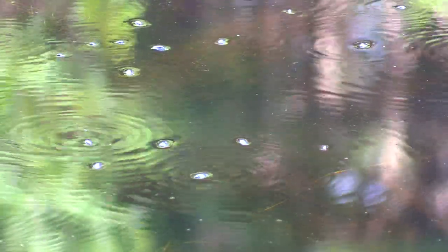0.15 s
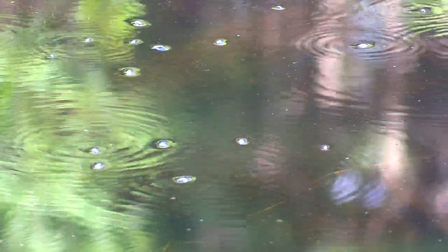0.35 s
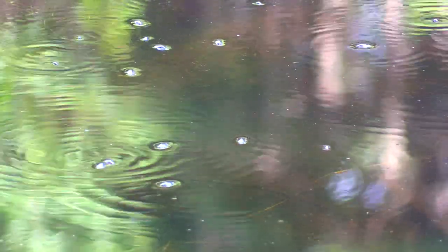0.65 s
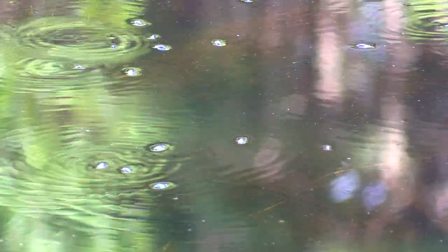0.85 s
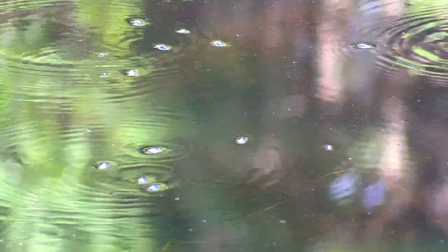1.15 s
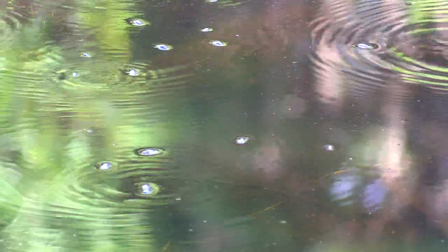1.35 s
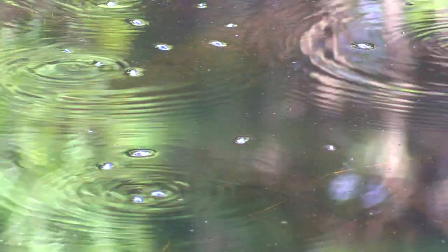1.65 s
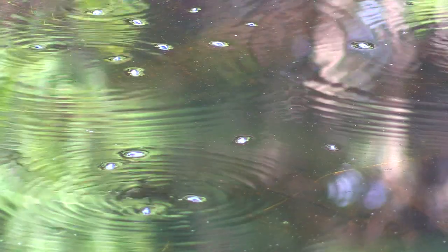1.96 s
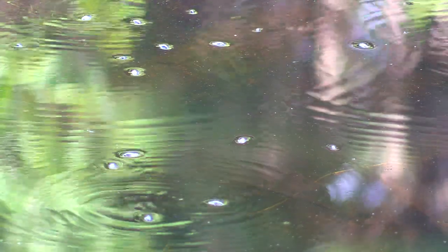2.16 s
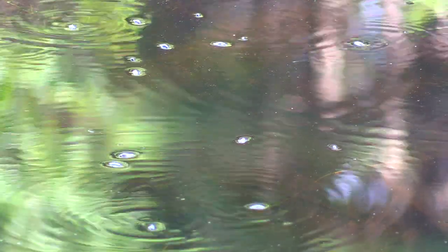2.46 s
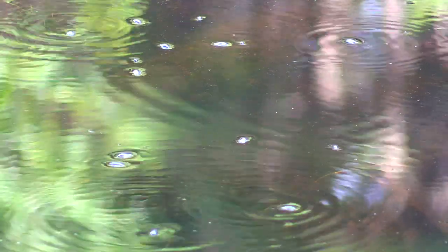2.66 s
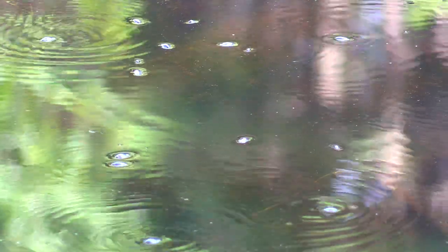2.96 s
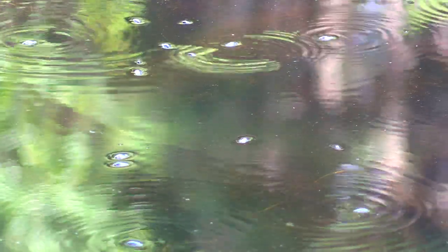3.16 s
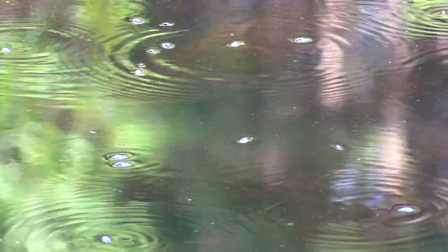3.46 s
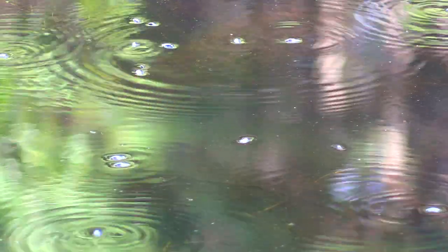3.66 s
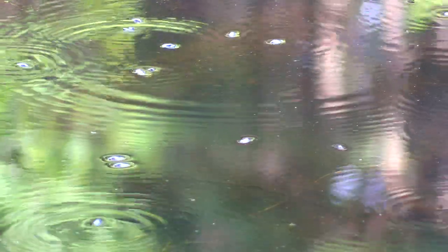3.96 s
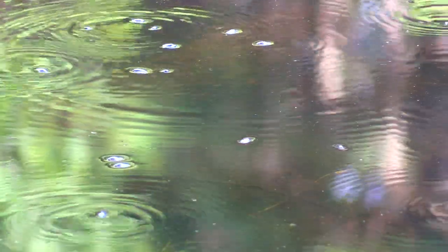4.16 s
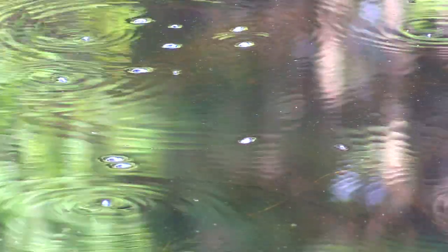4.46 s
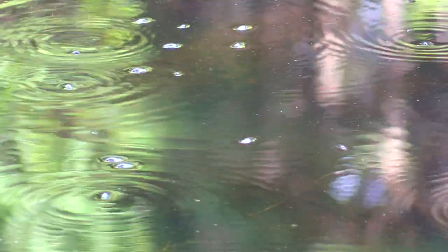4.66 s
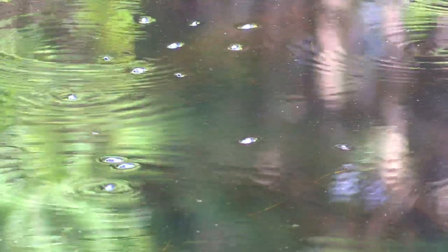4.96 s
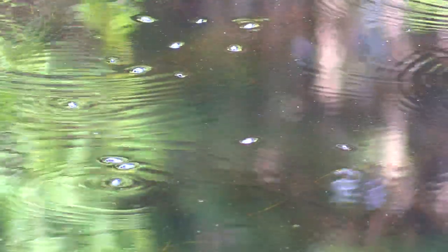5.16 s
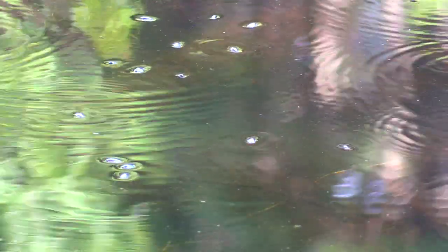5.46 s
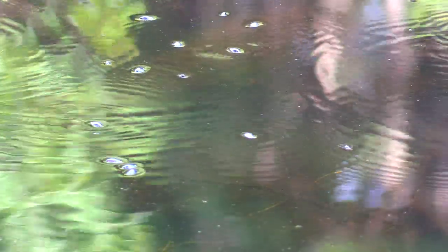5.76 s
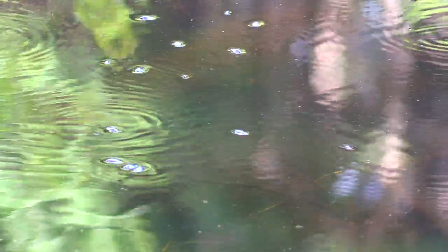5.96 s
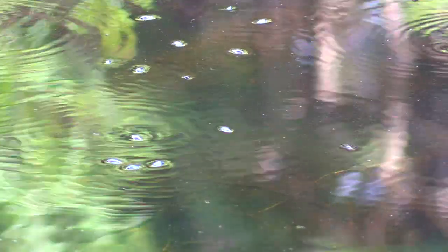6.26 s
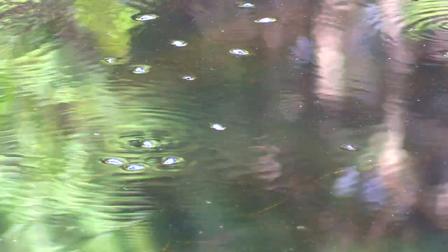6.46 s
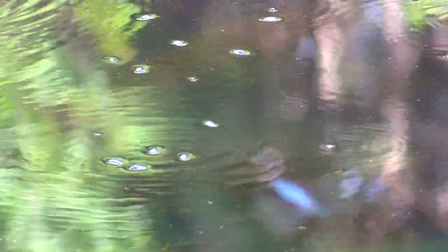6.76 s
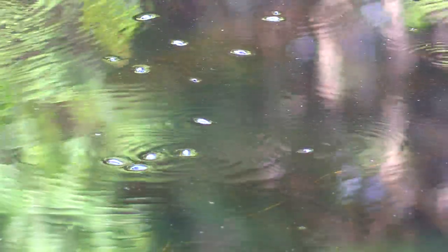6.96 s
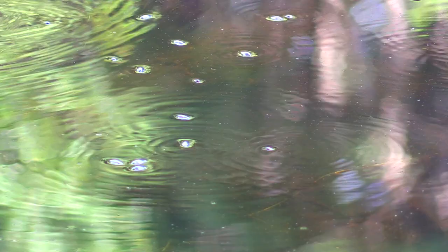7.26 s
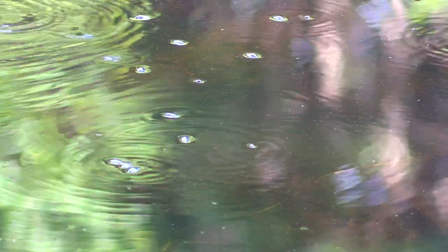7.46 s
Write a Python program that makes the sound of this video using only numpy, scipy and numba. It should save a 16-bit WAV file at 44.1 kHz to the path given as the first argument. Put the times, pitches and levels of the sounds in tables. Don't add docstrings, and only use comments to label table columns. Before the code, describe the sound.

A cicada sings close by at a summer pond, slightly left. Its dense, metallic high buzz swells from faint to full in just over a second while a far bird whistles softly. It falters with tiny dry snaps, breaks off, and a slightly slower, fluttering buzz takes over, steady for several seconds, then rougher and sliding down. Low airy noise, faint motor hum and distant insects lie beneath. Clean outdoor stereo pickup.

```python
import sys
import numpy as np
from scipy import signal
from scipy.io import wavfile
from scipy.ndimage import uniform_filter1d
from numba import njit

SR = 44100
rng = np.random.default_rng(int(sys.argv[2]) if len(sys.argv) > 2 else 0)


def gain_from_db(level_db):
    decades = np.asarray(level_db, float) / 20
    return 10 ** decades


def wav_out(sig):
    wavfile.write(sys.argv[1], SR, np.round(np.clip(np.atleast_2d(sig).T, -1, 1) * 32767).astype(np.int16))


N = 336042
STEP = 32
FRAMES = N // STEP + 2
LOWEST, OVERTONES = 23, 42
SECOND_HZ = 203.28
BREAK_S = 2.335

# (other overtones [dB], slow level sway [dB], restless sway [dB], left-right [dB])
POSTURES = [
    (-3, 1, .5, 0),
    (-5.5, 0, 2.5, 2.5),
    (-4, 0.5, 2.5, 2.5),
    (3.5, 4, 4, 2.2),
    (1.5, 1.5, 2, 1),
    (-2.5, 3, .5, 4.5),
    (5, 1, 1.5, 3.5),
    (4.5, 2.5, 1, 3),
    (-1, 5, 2.5, 2.5),
    (0, -0.5, 1, 3),
]


def cicada():
    s = np.arange(FRAMES) * STEP / SR
    level_db, ragged_db, rate_hz, flutter_hz, flutter_depth = effort(s)
    shares = posture_shares(s)
    sway_db, restless_db, pan_db = np.array(POSTURES)[:, 1:].T @ shares
    tremor_hz = 0.064 + 0.046 * gain_from_db(ragged_db / 2)

    heights = comb(shares)
    count = len(heights)
    neighbours = uniform_filter1d(heights ** 2, size=3, axis=0)
    even = np.sqrt(.5 * heights ** 2 + .5 * neighbours)
    hz = (LOWEST + np.arange(count)[:, None]) * rate_hz
    late = shares[-1]
    heights = heights + late * leaves(hz)
    above = even + late * leaves(hz + flutter_hz)
    below = even + late * leaves(hz - flutter_hz)
    broad = np.sqrt(uniform_filter1d(heights ** 2, size=9, axis=0))

    belly = 0.71 + 0.89 * np.exp(-((hz - 7700) / 900) ** 2)
    wavering_hz = flutter_hz + 2.74 * wander(7.2, count=1)[0].real
    beat = np.exp(2j * np.pi * np.cumsum(wavering_hz) * STEP / SR)
    high = np.clip((hz - 9500) / 3000, 0, 1)
    force = 1 + 0.041 * wander(35, count=1).real

    paths = []
    for path_db in (0 * high, -4.5 + 6.8 * high):
        creep = np.exp(.9j * wander(1.14, count).real)
        start = spin(count)
        slow_db = sway_db * wander(1.3, count).real
        quick_db = 0.96 * restless_db * wander(5.5, count).real
        line = start * creep * gain_from_db(slow_db + quick_db) + gain_from_db(-16.0) * wander(15.4, count)
        upper = above * wander(2.4, count) * beat
        lower = below * wander(1.2, count) / beat
        flutter = flutter_depth * belly * (upper + lower)
        rasp = gain_from_db(ragged_db) * np.sqrt(belly) * wander(85, count) * (above + below + 1.7 * broad) / 2
        voice = force * (heights * line + flutter + rasp)
        power = uniform_filter1d(np.sum(abs(voice) ** 2, axis=0) / 2, size=150)
        paths.append(gain_from_db(path_db + level_db) * voice / np.sqrt(power))

    mid, side = paths
    shared = np.sum(side * mid.conj(), axis=0).real / np.sum(abs(mid) ** 2, axis=0)
    side = side - mid * shared
    lean = np.tanh(0.075 * pan_db) * (1 - high)
    ports = np.array([mid * (1 + lean) + side, mid * (1 - lean) - side])
    rate_hz = rate_hz + tremor_hz * wander(11.1, count=1)[0].real
    phase = 2 * np.pi * np.cumsum(np.interp(np.arange(N) / SR, s, rate_hz)) / SR
    return overtones(np.ascontiguousarray(ports.transpose(0, 2, 1)), phase, LOWEST, STEP)


# (time [s], level [dB], strain as raggedness [dB])
FIRST_SONG = [
    (0, -38, -24),
    (.45, -35, -33),
    (.9, -28.5, -32),
    (1.26, -23, -30),
    (1.7, -21.5, -29),
    (2.15, -23, -24),
    (2.19, -22.5, -8),
    (2.31, -26, -2),
]
SECOND_SONG = [
    (2.36, -25, -2),
    (2.5, -25, -9),
    (3.0, -24.5, -15),
    (4.4, -24, -23),
    (5.45, -24, -15),
    (5.72, -24.5, -9.5),
    (6.0, -22, -14.5),
    (6.5, -23.5, -14.5),
    (7.62, -27, -0.5),
]
# (time [s], level [dB], half width [s])
DIPS = [
    (1.835, -2.2, .018),
    (2.328, -6.5, .02),
]


def effort(s):
    level_db, strain_db = curves(FIRST_SONG + SECOND_SONG, s)
    for dip_s, dip_db, half_s in DIPS:
        level_db = level_db + dip_db * np.exp(-((s - dip_s) / half_s) ** 4)
    second = s > BREAK_S
    first_hz = 208.87 - 18 * np.maximum(s - 2.21, 0)
    second_hz = tiring(s, SECOND_HZ, settle_hz=1.1, down_hz=6.55, down_s=.73)
    flutter_hz = tiring(s, 54.2, settle_hz=16, down_hz=31, down_s=1.15)
    flutter_depth = second * gain_from_db(-4.5 + 0.62 * strain_db)
    return level_db, strain_db, np.where(second, second_hz, first_hz), flutter_hz, flutter_depth


def tiring(s, steady_hz, settle_hz, down_hz, down_s):
    unsettled_hz = settle_hz * np.exp(-np.maximum(s - BREAK_S, 0) / .28)
    lost_hz = down_hz * np.exp((s - N / SR) / down_s)
    return steady_hz - unsettled_hz - lost_hz


# (start [s], duration [s])
SHIFTS = [(1.1, .15), (1.48, .1), (1.8, .07), (2.3, .06), (2.75, .25), (4.35, .3), (5.0, .25), (5.68, .12),
          (6.7, .35)]


def posture_shares(s):
    place = sum(np.clip((s - start) / length, 0, 1) for start, length in SHIFTS)
    return np.clip(1 - abs(place - np.arange(len(POSTURES))[:, None]), 0, 1)


# (multiple of the stroke rate [1], level [dB])
RISING = [(23, -16), (27, -15), (29, -5), (32, -13), (33, -14), (37, -7), (38, -6), (39, -3), (40, -8),
          (41, -8), (42, -10), (44, 0), (46, -9), (52, -17)]
FULL = [(27, -15), (29, -8), (35, -15), (39, 0), (40, -12), (43, -11), (44, -11), (45, -11), (46, -16)]
LEANING = [(26, -16), (28, -13), (29, -14), (32, -10), (34, -14), (37, -14), (38, -10), (39, -3), (40, 0),
           (43, -11), (45, -7), (47, -15)]
TURNED = [(26, -13), (28, -4), (29, -8), (31, -20), (32, -14), (34, -10), (37, -8), (38, -2), (39, 0),
          (40, -3), (41, -6), (43, -9), (44, -6), (46, -9)]
STARTING = [(24, -18), (28, -9), (29, -6), (30, -6), (31, -5), (35, -7), (37, 0), (40, -4), (41, -2),
            (43, -7), (44, -5), (46, -6)]
SETTLED = [(24, -13), (28, -9), (30, -3), (32, -20), (34, -9), (37, -8), (40, -6), (41, 0), (43, -11),
           (45, -12), (47, -4), (49, -15), (51, -18), (53, -17)]
OPEN = [(24, -12), (28, -3), (30, -2), (35, -4), (37, -1), (39, -2), (40, 0), (41, -3), (43, -6), (45, -3),
        (47, -4), (51, -13), (53, -14)]
WIDE = [(25, -14), (28, -7), (29, -5), (30, -7), (31, -7), (35, -4), (37, -1), (39, 0), (40, -4), (43, -6),
        (44, -6), (45, -4), (46, -3), (51, -14)]
TIRING = [(25, -21), (29, -6), (33, -6), (35, -6), (37, -12), (39, 0), (40, -13), (43, -6), (44, -10),
          (45, -13), (46, -9), (50, -17), (52, -18)]
# (frequency [Hz], level [dB])
BODY = [(4700, -27.5), (5500, -23), (7400, -13.5), (9400, -15), (10600, -26.5), (13200, -37)]


def comb(shares, scatter_db=4.5):
    favourites = [RISING, FULL, LEANING, TURNED, STARTING, SETTLED, OPEN, WIDE, TIRING]
    body_db = at_hz(BODY, (LOWEST + np.arange(OVERTONES)) * SECOND_HZ)
    scatter = np.minimum(rng.standard_normal((len(favourites), OVERTONES)), 1.5)
    db = body_db + np.array(POSTURES)[:-1, [0]] + scatter_db * scatter
    for row, standing_out in zip(db, favourites):
        multiple, level_db = np.transpose(standing_out)
        row[multiple - LOWEST] = level_db
    heights = gain_from_db(db)
    power = np.sum(heights ** 2, axis=1, keepdims=True) / 2
    return (heights / np.sqrt(power)).T @ shares[:-1]


# (frequency [Hz], width [Hz], level [dB])
LEAVES = [(5430, 34, -16), (5720, 50, -3), (5840, 31, -4), (6180, 48, -12), (6640, 86, -5), (7070, 97, -7),
          (7410, 55, 0), (7640, 20, -8), (7850, 66, 0), (8110, 63, -5), (8620, 81, -3), (8830, 42, -3),
          (9080, 140, -6), (9620, 150, -13)]


def leaves(hz, floor_db=-25.0):
    power = gain_from_db(2 * floor_db) * np.exp(-((hz - 7500) / 2500) ** 2)
    for centre_hz, width_hz, db in LEAVES:
        power = power + gain_from_db(2 * db) / (1 + (2 * (hz - centre_hz) / width_hz) ** 2)
    return np.sqrt(power / np.mean(np.sum(power, axis=0) / 2))


@njit
def overtones(gains, phase, first, step):
    out = np.zeros((gains.shape[0], len(phase)))
    for i in range(len(phase)):
        j, part = i // step, (i % step) / step
        turn, z = np.exp(1j * phase[i]), np.exp(1j * first * phase[i])
        for k in range(gains.shape[2]):
            for c in range(gains.shape[0]):
                gain = gains[c, j, k] * (1 - part) + gains[c, j + 1, k] * part
                out[c, i] += (gain * z).real
            z *= turn
    return out


def spin(count, turns=.75):
    return np.exp(2j * np.pi * turns * rng.random((count, 1)))


def wander(rate_hz, count):
    r = np.exp(-2 * np.pi * rate_hz * STEP / SR)
    shape = (count, FRAMES + 1000)
    white = rng.standard_normal(shape) + 1j * rng.standard_normal(shape)
    slow = signal.lfilter([1], [1, -2 * r, r * r], white)[:, 1000:]
    return slow / np.sqrt(np.mean(abs(slow) ** 2))


def curves(rows, s):
    t, *columns = np.transpose(rows)
    return [np.interp(s, t, c) for c in columns]


def at_hz(points, hz):
    point_hz, value = np.transpose(points)
    return np.interp(np.log(hz), np.log(point_hz), value)


# (time [s], peak level [dB])
SLIPS = [(2.2044, -19), (2.2144, -16), (2.235, -14), (2.3783, -20), (2.415, -18), (2.419, -18),
         (2.4544, -19), (2.5594, -20)]


def slips():
    clicks = np.zeros(N) + 1e-18
    for s, db in SLIPS:
        clicks[round(s * SR)] = gain_from_db(db + 13.5)
    abdomen = signal.butter(2, [5500, 9800], "band", fs=SR, output="sos")
    return signal.sosfilt(abdomen, clicks) * gain_from_db(np.array([[1.5], [-1.5]]))


# (time [s], duration [s], start frequency [Hz], end frequency [Hz], level [dB])
WHISTLES = [
    (.15, .07, 2620, 2270, -53),
    (.44, .17, 2810, 2750, -57),
    (.48, .11, 2720, 2250, -53),
    (.6, .07, 2220, 2320, -53),
    (.8, .1, 2720, 2250, -54),
    (.84, .08, 2770, 2730, -57),
    (1.55, .035, 1180, 1230, -49),
]


def whistles():
    out = np.zeros(N)
    for s, length, from_hz, to_hz, db in WHISTLES:
        n = round(length * SR)
        phase = 2 * np.pi * np.cumsum(np.linspace(from_hz, to_hz, n)) / SR
        out[round(s * SR):][:n] += gain_from_db(db + 1.5) * np.hanning(n) ** .5 * np.sin(phase)
    return out


# (frequency [Hz], density [dB per Hz])
AIR = [(18, -73), (30, -45), (70, -23), (97, -10), (210, -1), (454, -7), (1310, -14), (3000, -18),
       (4200, -12.5), (7000, -23), (10500, -11), (13000, -22.5), (16000, -36)]
# (frequency [Hz], left-right likeness [1])
LIKENESS = [(60, 0.83), (250, 0.72), (1000, 0.29), (4000, 0.24), (9000, 1), (15000, 0)]


def air(patchy_db=-0.22):
    out = 0
    edges = 30 * 2 ** np.arange(0, 9.6, .5)
    white = rng.standard_normal((2, 2, N))
    patches = wander(1.2, count=19).real
    chorus_db = 0.26 * (np.arange(N) - N / 2) / SR
    for k, (low, high) in enumerate(zip(edges, np.minimum(edges[1:], 18000))):
        band = signal.butter(2, [low, high], "band", fs=SR, output="sos")
        mid, side = signal.sosfilt(band, white[k % 2])
        hz = np.sqrt(low * high)
        alike = np.clip(at_hz(LIKENESS, hz), -1, 1)
        near = np.exp(-np.log2(hz / 3500) ** 2)
        patch_db = patchy_db * np.repeat(patches[k], STEP)[:N]
        gain = gain_from_db(at_hz(AIR, hz) + near * chorus_db + patch_db)
        out = out + gain * (np.sqrt(1 + alike) * mid + np.sqrt(1 - alike) * side * [[1], [-1]])
    return gain_from_db(-40) * out / np.sqrt(np.mean(out ** 2))


def hum():
    s = np.arange(N) / SR
    level_db = -45.5 - 7.5 * np.clip((s - 2.5) / .55, 0, 1)
    slow = wander(3.0, count=1)[0].real
    waver = 1 + .3 * np.interp(np.arange(N) / STEP, np.arange(FRAMES), slow)
    phase = 2 * np.pi * 214.4 * s
    return gain_from_db(level_db + 0.5) * waver * (np.sin(phase) + gain_from_db(-10.5) * np.sin(phase / 2))


def scene():
    return cicada() + slips() + whistles() + air() + hum()


def low_pass(x):
    return signal.sosfilt(signal.butter(12, 15900, fs=SR, output="sos"), x)


def record(dry):
    return low_pass(dry)


dry = scene()
out = record(dry)
wav_out(out)
```